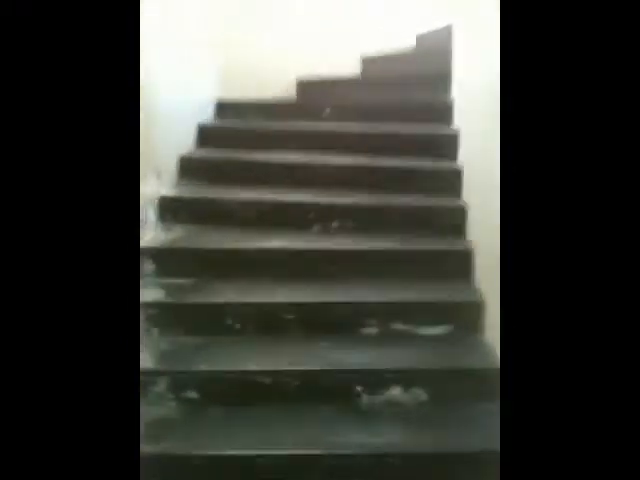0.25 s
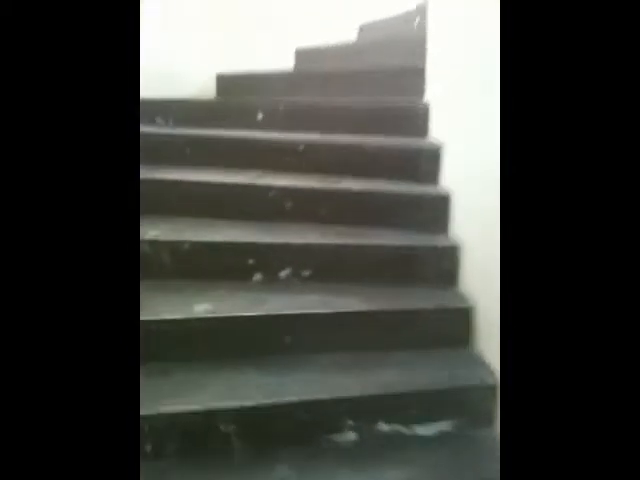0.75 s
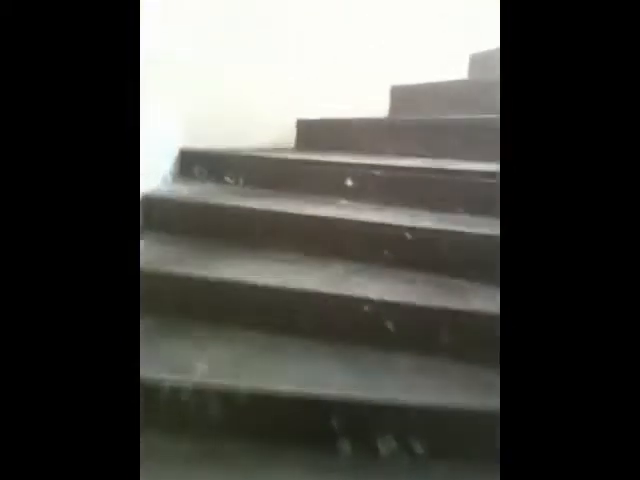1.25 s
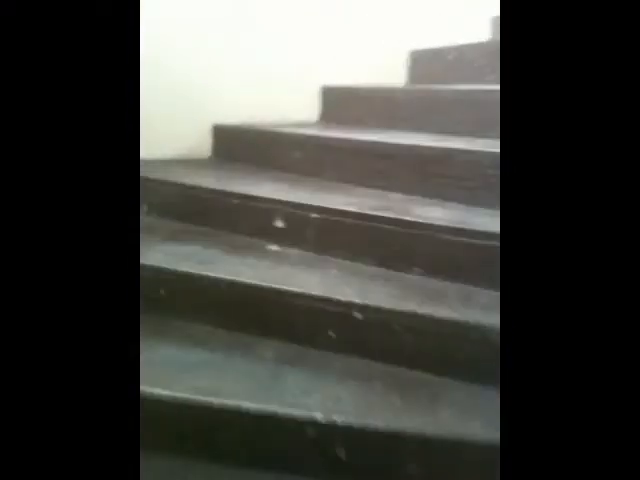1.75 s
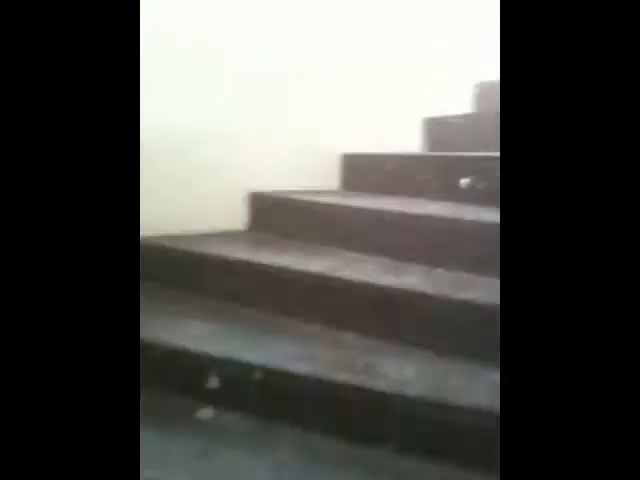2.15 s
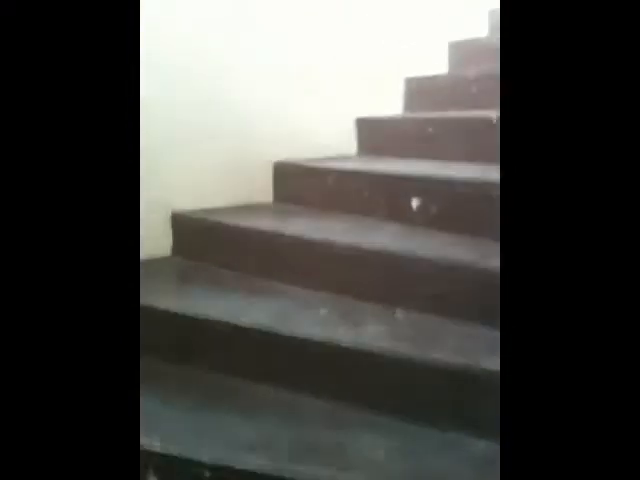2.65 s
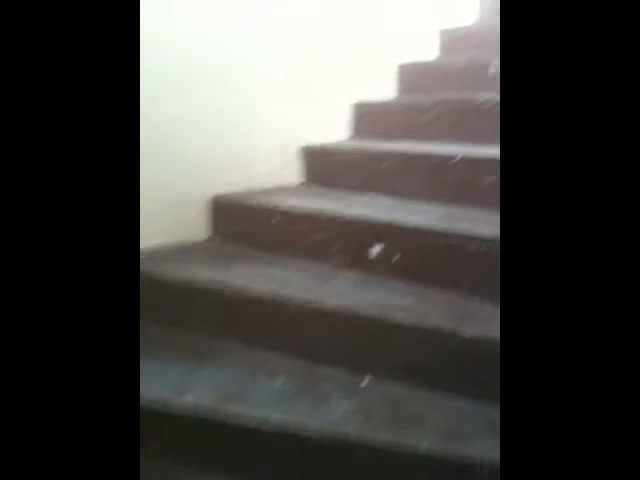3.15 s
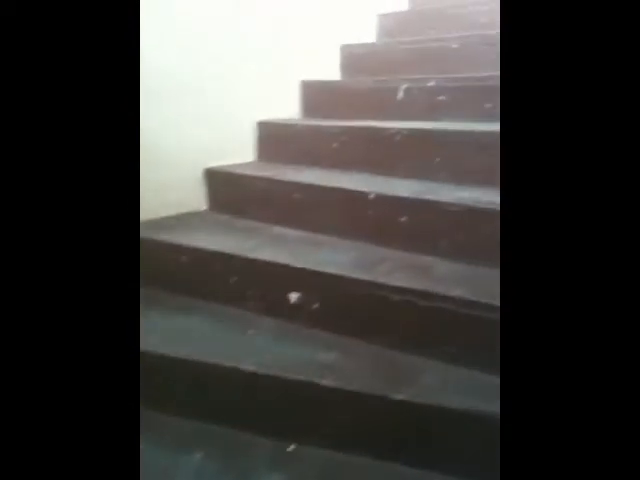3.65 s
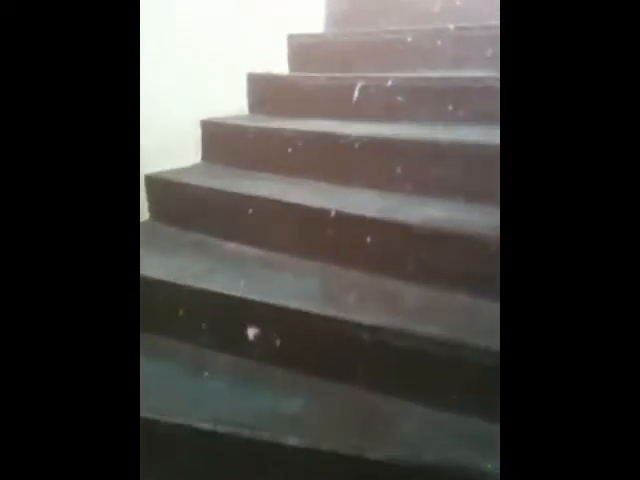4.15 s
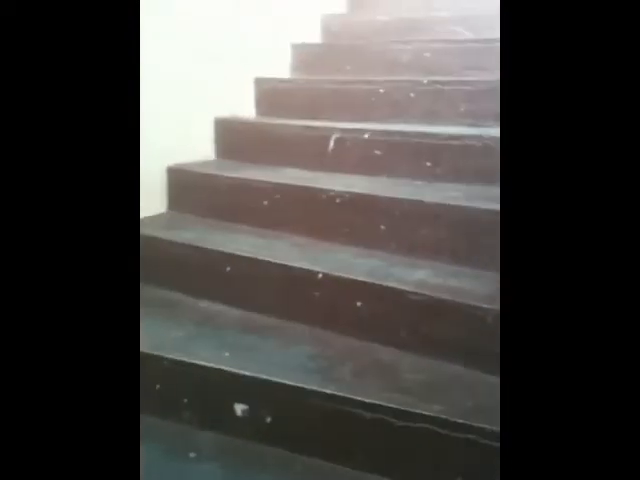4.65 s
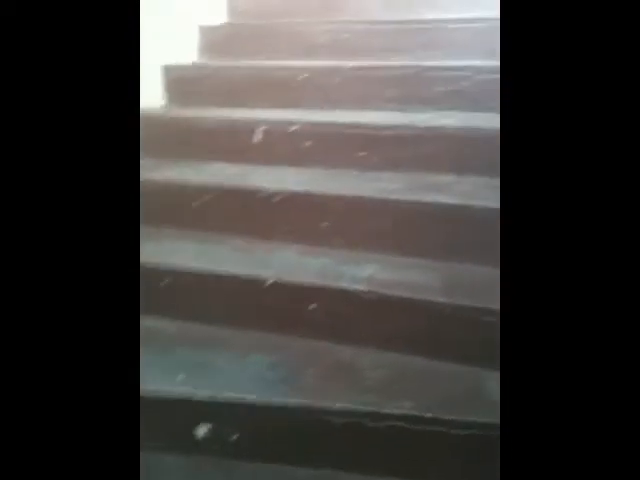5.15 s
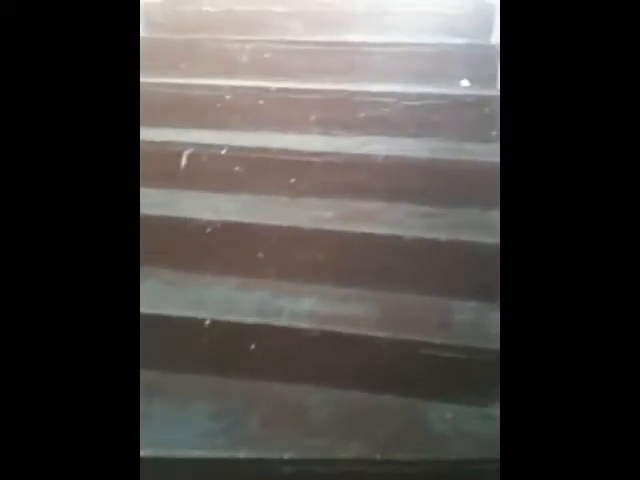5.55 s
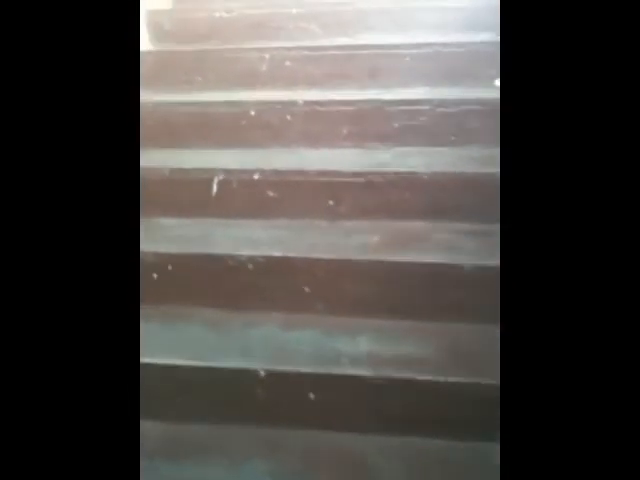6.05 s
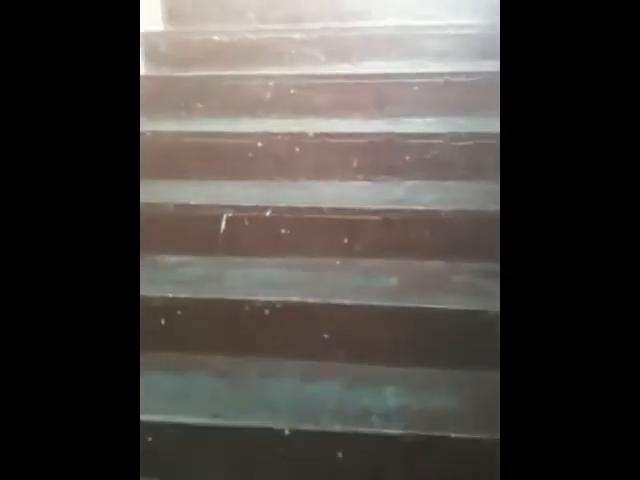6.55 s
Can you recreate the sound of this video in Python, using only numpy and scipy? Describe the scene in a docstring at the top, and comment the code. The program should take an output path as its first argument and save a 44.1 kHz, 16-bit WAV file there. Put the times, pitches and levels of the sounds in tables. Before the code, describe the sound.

Two big generators run continuously beyond a hard-walled stairwell. A low hum and a harmonic-rich whine ride over a broad roar of water and air. The microphone is carried upstairs; individual tones swell and fade with the echoes while the whole sound grows louder, brighter and hissier, strongest in the final two seconds. No footsteps stand out.

```python
"""A stairwell behind two hydroelectric generators; the microphone is carried up the stairs toward them.
One machine sings a 191 Hz whine rich in harmonics with shaft-rate sidebands, the other a 327 Hz hum.
Under both lie casing tones and the roar of water and air, as noise and tones shaped in the spectrum.
The strongest tones swell and fade through standing waves and flares; all but the deep bass grows
louder and brighter on the climb."""
import sys
import numpy as np
from scipy import signal
from scipy.fft import irfft
from scipy.io import wavfile

SR = 44100
rng = np.random.default_rng(int(sys.argv[2]) if len(sys.argv) > 2 else 0)


def unload_audio(sound):
    """Save the sound as a 16-bit wav file, at the path given as the first command line argument."""
    columns = np.transpose(np.atleast_2d(sound))
    # keep every value between -1 and 1, then stretch to whole-number steps
    steps = np.round(np.clip(columns, -1, 1) * 32767)
    wavfile.write(sys.argv[1], SR, steps.astype(np.int16))


N = 299880
T = np.arange(N) / SR
BINS = np.arange(N // 2 + 1) * SR / N  # Hz

ROTOR_HZ, POLES = 191.45, 12  # first machine: pole-passing rate
HUM_HZ, HUM_POLES = 327.0, 20  # second machine

# flares, where the echoes of one overtone add up at the microphone:
# (centre time [s], frequency [Hz], length [s], level [dB])
OVERTONE_FLARES = [(1.03, 473.7, 1.33, -38.0), (3.97, 473.7, 2.28, -37.5), (5.59, 473.7, 1.3, -32.0),
                   (2.1, 505.4, 0.5, -37.5), (1.15, 574.3, 1.1, -39.0), (2.7, 574.3, 1.4, -39.0),
                   (3.85, 574.3, 1.0, -39.0), (4.8, 574.3, 1.2, -42.0), (6.55, 574.3, 0.8, -34.5),
                   (1.31, 765.8, 1.43, -40.0), (2.04, 765.8, 0.9, -38.5), (2.76, 765.8, 0.39, -35.0),
                   (3.11, 765.8, 0.49, -35.5), (4.01, 765.8, 1.9, -38.5), (5.5, 765.8, 0.8, -37.5),
                   (6.27, 765.8, 1.39, -32.5), (0.15, 981.0, 0.6, -44.0), (1.79, 981.0, 0.84, -40.5),
                   (2.32, 981.0, 0.37, -37.0), (2.95, 981.0, 0.9, -43.5), (4.38, 981.0, 1.64, -35.5),
                   (5.8, 981.0, 0.97, -34.0), (6.39, 981.0, 0.41, -33.0), (6.73, 981.0, 0.35, -31.0),
                   (0.35, 1148.7, 0.6, -40.0), (0.75, 1148.7, 0.4, -41.5), (4.1, 1148.7, 0.9, -41.0),
                   (5.3, 1148.7, 0.7, -36.0), (6.7, 1148.7, 0.7, -37.0), (0.64, 1340.1, 0.7, -38.0),
                   (1.03, 1340.1, 0.4, -38.0), (2.4, 1340.1, 0.62, -37.0), (3.47, 1340.1, 0.58, -38.5),
                   (4.52, 1340.1, 0.65, -37.5), (6.0, 1340.1, 0.95, -33.0), (6.55, 1340.1, 0.48, -33.0),
                   (0.2, 1531.6, 0.41, -33.5), (0.99, 1531.6, 1.04, -36.5), (1.99, 1531.6, 0.84, -35.5),
                   (2.55, 1531.6, 0.29, -34.5), (3.17, 1531.6, 0.59, -36.0), (5.34, 1531.6, 0.8, -34.0),
                   (5.75, 1531.6, 0.32, -29.0), (6.56, 1531.6, 0.49, -29.5), (1.2, 1723.1, 0.45, -38.5),
                   (3.8, 1723.1, 0.7, -34.5), (4.9, 1723.1, 0.7, -37.0), (5.7, 1723.1, 0.9, -37.0),
                   (6.75, 1723.1, 0.4, -32.5), (0.27, 1914.5, 0.5, -35.5), (0.68, 1914.5, 0.43, -34.0),
                   (2.11, 1914.5, 0.4, -31.5), (2.53, 1914.5, 0.47, -34.0), (3.84, 1914.5, 0.42, -33.0),
                   (4.5, 1914.5, 0.61, -32.0), (5.62, 1914.5, 0.95, -29.5), (0.58, 2105.9, 0.63, -32.5),
                   (1.06, 2105.9, 0.75, -32.0), (1.77, 2105.9, 0.52, -33.0), (2.41, 2105.9, 0.23, -31.5),
                   (2.81, 2105.9, 0.44, -31.5), (3.27, 2105.9, 0.77, -34.5), (3.97, 2105.9, 0.9, -29.5),
                   (4.62, 2105.9, 0.51, -27.5), (5.29, 2105.9, 0.83, -26.0), (5.75, 2105.9, 0.63, -32.5),
                   (6.39, 2105.9, 0.7, -26.5), (2.13, 2297.4, 0.73, -35.5), (2.65, 2297.4, 0.54, -35.0),
                   (3.06, 2297.4, 0.5, -35.0), (4.44, 2297.4, 0.25, -27.0), (4.85, 2297.4, 0.8, -33.0),
                   (5.51, 2297.4, 0.41, -29.5), (6.0, 2297.4, 0.5, -30.0), (6.58, 2297.4, 0.62, -27.0),
                   (0.12, 2488.8, 0.35, -32.5), (0.69, 2488.8, 0.76, -34.0), (1.34, 2488.8, 0.32, -30.0),
                   (2.69, 2488.8, 0.52, -33.5), (5.18, 2488.8, 0.75, -31.5), (6.11, 2488.8, 0.36, -27.0),
                   (6.39, 2488.8, 0.4, -26.0), (2.37, 2871.7, 0.74, -35.0), (4.87, 2871.7, 0.5, -33.5),
                   (6.56, 2871.7, 0.45, -31.5)]


def amp(db):
    """Decibels to gain."""
    return 10 ** (np.asarray(db) / 20)


def unit(x):
    """Scale to rms 1."""
    return x / np.sqrt(np.mean(np.abs(x) ** 2))


def curves(table):
    """The dB columns of a time table as gains at every sample."""
    s, *columns = np.transpose(table)
    return [amp(np.interp(T, s, column)) for column in columns]


def colour(points):
    """Gain at every frequency from (frequency [Hz], level [dB]) points."""
    hz, db = np.transpose(points)
    return amp(np.interp(np.log(BINS + 1), np.log(hz), db))


def scatter():
    """Random amplitude and phase at every frequency."""
    real = rng.standard_normal(len(BINS))
    imaginary = rng.standard_normal(len(BINS))
    return (real + 1j * imaginary) / np.sqrt(2)


def wander(rate_hz):
    """Slow random motion of rms 1."""
    return unit(irfft(scatter() * np.exp(-(BINS / rate_hz) ** 2), N))


def room_modes(depth_db=3.0, spacing_hz=7.0):
    """The stairwell favours some frequencies and swallows their neighbours; the mean power gain is 1."""
    hz = np.arange(0, SR / 2, spacing_hz)
    mode_heights = scatter().real[:len(hz)] * np.sqrt(2)
    return unit(amp(depth_db * np.interp(BINS, hz, mode_heights)))


def roar(gain_db=1, edge_hz=11700):
    """Turbulence ringing in the stairwell, dying away steeply in the top treble."""
    # turbulent water and cooling air, before gain_db: (frequency [Hz], density [dB per Hz])
    turbulence = [(35, -90), (82, -85.5), (150, -59.5), (400, -61.5), (850, -65), (1300, -69.5),
                  (1700, -68), (2400, -64.5), (3300, -68), (4250, -69), (4800, -71), (5300, -68),
                  (6500, -70), (7400, -73), (9800, -75), (11700, -83.5)]
    edge = 1 / np.sqrt(1 + (BINS / edge_hz) ** 60)
    noise = scatter() * colour(turbulence) * room_modes() * edge
    return noise * amp(gain_db) * np.sqrt(N * SR / 2)


def diffuse(lines, pace_m_s=0.43, blur_hz=1.0):
    """Spectrum of (Hz, dB) tones from all sides: walking Doppler-spreads each, so it fades in and out."""
    paths, out = scatter(), np.zeros(len(BINS), complex)
    for hz, db in lines:
        spread_hz = blur_hz + hz * pace_m_s / 343  # speed of sound in m/s
        near = slice(*np.searchsorted(BINS, [hz - 2 * spread_hz, hz + 2 * spread_hz]))
        band = paths[near] * np.exp(-((BINS[near] - hz) / spread_hz) ** 4)
        out[near] += band * amp(db) * N / np.sqrt(2 * np.sum(np.abs(band) ** 2))
    return out


def shaft_comb(shaft_hz, resonances, count=560):
    """Multiples of a shaft rate, sounding through the resonances of the casing."""
    hz = shaft_hz * np.arange(1, count + 1)
    power = sum(amp(db) ** 2 * np.exp(-(2 * (hz - centre_hz) / width_hz) ** 2)
                for centre_hz, width_hz, db in resonances)
    return diffuse(zip(hz, 10 * np.log10(power + 1e-14)))


def whine(flutter_db=-8.0, flutter_rise_db=2.0, lean_db=0.95, between_flares_db=-6.0):
    """Pole-passing harmonics; the uneven rotor adds sidebands one shaft rate away, rising with order."""
    # first machine, before the flare reduction: (multiple of the pole-passing rate, level [dB])
    harmonics = [(3, -48.5), (4, -44.5), (5, -41), (6, -42), (7, -37.5), (8, -35.5), (9, -37.5), (10, -35),
                 (11, -33.5), (12, -33), (13, -32.5), (14, -38), (15, -35), (16, -46), (17, -45),
                 (18, -49.5), (19, -41), (20, -45), (21, -41), (22, -39.5), (23, -44.5), (24, -50),
                 (25, -49.5), (26, -50), (27, -42.5), (28, -49.5), (29, -47), (30, -59), (31, -45),
                 (32, -51), (33, -44), (34, -52.5), (35, -46.5), (36, -61)]
    lines, flaring = [], {round(row[1]) for row in OVERTONE_FLARES}
    for order, db in harmonics:
        hz, octaves = order * ROTOR_HZ, np.log2(order / 10)
        # harmonics that also flare are fainter here
        lines.append((hz, db + between_flares_db * (round(hz) in flaring)))
        side_db = db + flutter_db + flutter_rise_db * octaves
        lean = lean_db * max(octaves, 0) ** 2  # above order 10 the lower side is stronger
        for way in (-1, 1):
            lines.append((hz + way * ROTOR_HZ / POLES, side_db - way * lean))
    return diffuse(lines)


def stairwell(spectrum, approach):
    """Deep bass fills the building at a constant level; higher bands open up over the climb."""
    # climb toward the machine hall, relative, each scaled to rms 1 after the approach exponent:
    # (time [s], rumble [dB], whine [dB], hiss [dB])
    climb = [(0, -34.5, -27.5, -34.5), (1.7, -35.5, -26, -32.5), (3.5, -32, -25, -30.5),
             (4.6, -32.5, -23.5, -27), (5.1, -32, -22, -24.5), (5.5, -29, -20, -23), (6, -30.5, -18.5, -23),
             (6.8, -28, -18, -23)]
    rumble, ring, hiss = [gain ** approach for gain in curves(climb)]
    # the top treble opens most steeply
    gains = [1, unit(rumble), unit(ring), unit(hiss), unit(hiss ** 2)]
    centres = np.log([130, 500, 2000, 8500, 12000])  # Hz: bass, rumble, whine, hiss, air
    shares = [np.interp(np.log(BINS + 1), centres, row) for row in np.eye(len(centres))]
    return sum(gain * irfft(spectrum * share, N) for gain, share in zip(gains, shares))


def machines(tint=1):
    """Reverberant hall sound along the stairs; the first machine gains less on the climb than the rest."""
    # casing resonances, first machine: (centre [Hz], width [Hz], level of a shaft order at centre [dB])
    first_casing = [(700, 380, -54), (2450, 900, -56), (2212, 36, -46), (2390, 50, -45), (3540, 60, -57),
                    (3685, 60, -49.5), (4128, 40, -53), (4305, 90, -48.5), (4200, 1400, -64),
                    (5280, 70, -56), (6030, 90, -56), (6480, 650, -54.5), (7900, 900, -62)]
    # casing resonances, second machine: (centre [Hz], width [Hz], level of a shaft order at centre [dB])
    second_casing = [(1645, 85, -40.5), (1980, 100, -47.5), (1900, 900, -57)]
    # mains hum, shaft orders and casing tones of both machines: (frequency [Hz], level [dB])
    steady_tones = [(100.3, -58), (209.9, -44.5), (300.1, -40), (368.8, -46.5), (397, -47.5), (421.2, -46),
                    (442.1, -45.5), (473.7, -48), (490, -47), (505.4, -45), (526, -48), (547.1, -47.5),
                    (654.1, -42), (665, -50), (678, -48), (701.2, -45.5), (794.7, -45.5), (981, -49.5),
                    (995.9, -44.5), (1191, -50), (1308, -53), (1588, -58), (1798, -51), (2058, -56),
                    (2649, -58), (3176, -57), (3461, -45), (5085, -48.5), (5470, -57), (7068, -47.5),
                    (7259, -50)]
    first = whine() + shaft_comb(ROTOR_HZ / POLES, first_casing)
    rest = shaft_comb(HUM_HZ / HUM_POLES, second_casing) + diffuse(steady_tones) + roar()
    return stairwell(first * tint, approach=0.88) + stairwell(rest * tint, approach=0.95)


def drone(hz, wave, sway_rad, shimmer_db, channel_sway_rad, gain_db=0.0):
    """One tone under a slow envelope; its phase sways as the microphone moves, not alike in both channels."""
    common = sway_rad * wander(2.6)
    apart = channel_sway_rad * wander(2.2) * np.array([[1], [-1]])
    phase = 2 * np.pi * hz * T + common + apart
    return np.sqrt(2) * np.imag(wave * np.exp(1j * phase)) * amp(gain_db + shimmer_db * wander(9.5))


def flares():
    """Each strong overtone holds its pitch while smooth arches lift and sink it, alternating in sign."""
    out = 0
    for hz in sorted({row[1] for row in OVERTONE_FLARES}):
        swells = [row for row in OVERTONE_FLARES if row[1] == hz]
        wave = 0
        for k, (centre_s, _, length_s, db) in enumerate(swells):
            arch = np.cos(np.pi * np.clip((T - centre_s) / length_s, -.5, .5))
            wave = wave + (-1) ** k * amp(db) * arch
        out = out + drone(hz, wave, sway_rad=0.21, shimmer_db=1.67, channel_sway_rad=0.061)
    return out


def standing(nodes, sharpness):
    """Standing wave: arches between nodes, flipping sign; a weak travelling wave fills the nodes."""
    s, node_db, crest_db = np.transpose(nodes)
    passed = np.interp(T, s, np.arange(len(s)))
    arch = np.sin(np.pi * passed)
    crests = amp(crest_db[passed.astype(int)]) * np.sign(arch) * np.abs(arch) ** sharpness
    return crests - 1j * amp(np.interp(T, s, node_db)) * np.cos(np.pi * passed)


def octave_drone():
    """The octave of the first machine's rotor tone, heard through its standing wave."""
    # nodes passed: (time [s], level in the node [dB], level of the crest after it [dB])
    octave_nodes = [(-1, -40, -33), (2.05, -55, -38), (2.98, -52, -32.5), (5.05, -39.5, -30),
                    (7.9, -38, -29.5)]
    wave = standing(octave_nodes, sharpness=0.84)
    return drone(2 * ROTOR_HZ, wave, sway_rad=0.29, shimmer_db=1.7, channel_sway_rad=0.04)


def hum_drone():
    """The second machine's hum, heard through its standing wave."""
    # nodes passed, before gain_db: (time [s], level in the node [dB], level of the crest after it [dB])
    hum_nodes = [(-.05, -41, -31.8), (1.35, -48, -43), (1.56, -44, -31), (1.98, -50, -32),
                 (3.02, -32.5, -24.5), (3.83, -48, -28.5), (4.3, -27, -22.5), (5.35, -21, -13),
                 (6.88, -24, -14)]
    wave = standing(hum_nodes, sharpness=0.95)
    return drone(HUM_HZ, wave, sway_rad=0.31, shimmer_db=0.74, channel_sway_rad=0.069, gain_db=0.4)


def rotor_drone():
    """The fundamental of the first machine's rotor, heard through its standing wave."""
    # nodes passed, before gain_db: (time [s], level in the node [dB], level of the crest after it [dB])
    rotor_nodes = [(-.9, -36, -25.3), (1.25, -40, -23.5), (3.02, -34, -24.2), (4.82, -48, -26.3),
                   (6.64, -46, -40), (8.4, -46, -40)]
    wave = standing(rotor_nodes, sharpness=0.74)
    return drone(ROTOR_HZ, wave, sway_rad=0.093, shimmer_db=0.6, channel_sway_rad=0.014, gain_db=0.15)


def scene(balance_db=-0.85):
    """The strongest tones drone over the diffuse machine sound, spread in stereo by a side signal."""
    # stereo width by frequency: (frequency [Hz], side minus mid [dB])
    stereo_width = [(60, -7), (150, -10), (300, -26), (550, -14.5), (1200, -17.5), (2300, -20),
                    (4500, -18.5), (9000, -11.5)]
    mid, side = machines(), machines(colour(stereo_width))
    left = (mid + side) * amp(balance_db / 2)
    right = (mid - side) * amp(-balance_db / 2)
    drones = octave_drone() + hum_drone() + rotor_drone()
    return np.array([left, right]) + flares() + drones


def record(dry):
    """The sound starts and stops softly, its very highest peaks are rounded and its top is cut."""
    top_hz, fade_s, ceiling = 13690, .008, .95
    ends = np.clip(np.minimum(T, T[-1] - T) / fade_s, 0, 1)
    rounded = ends * dry / (1 + (dry / ceiling) ** 8) ** (1 / 8)
    return signal.sosfilt(signal.ellip(8, .1, 80, top_hz, fs=SR, output="sos"), rounded)


dry = scene()
out = record(dry)
unload_audio(out)
```